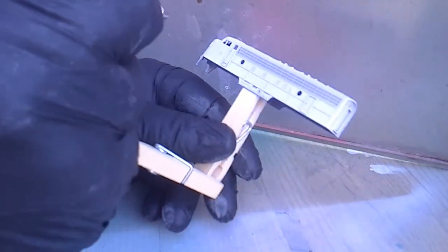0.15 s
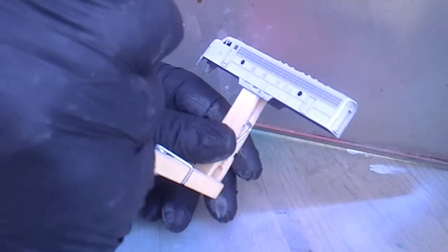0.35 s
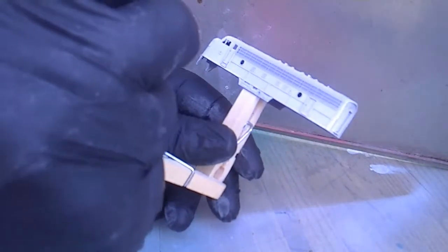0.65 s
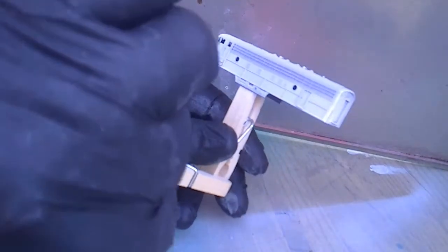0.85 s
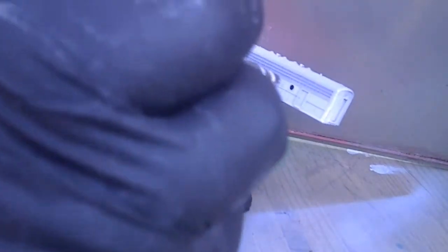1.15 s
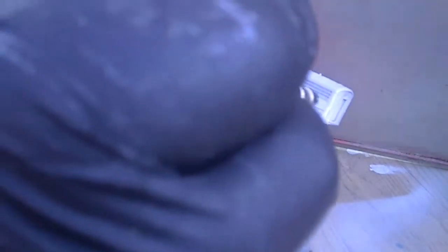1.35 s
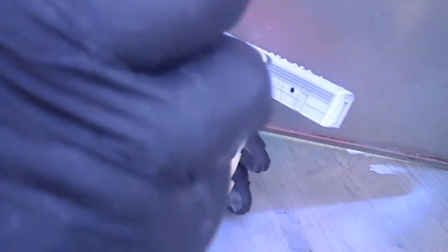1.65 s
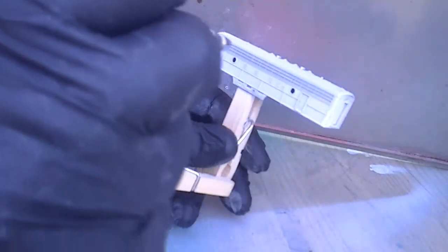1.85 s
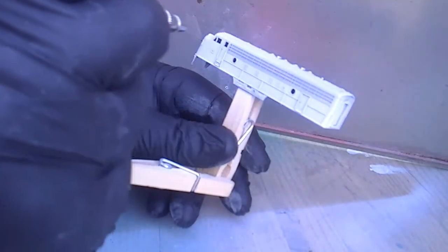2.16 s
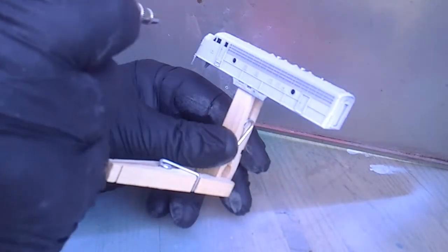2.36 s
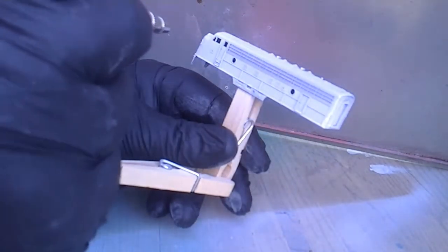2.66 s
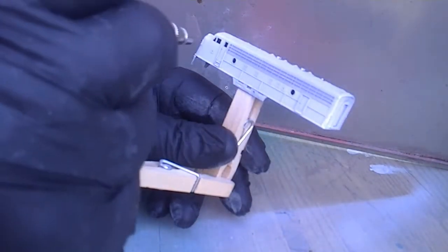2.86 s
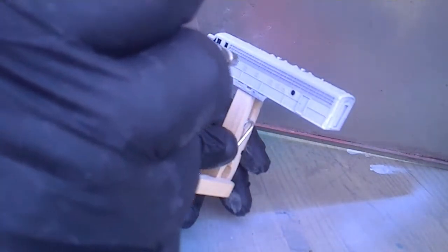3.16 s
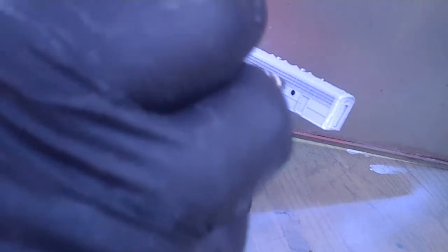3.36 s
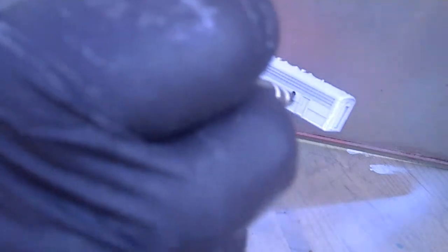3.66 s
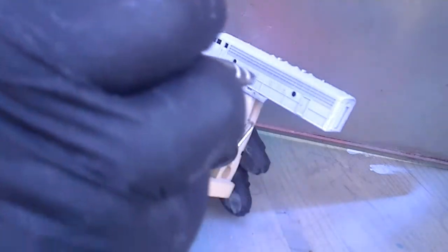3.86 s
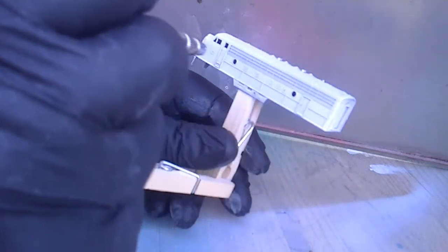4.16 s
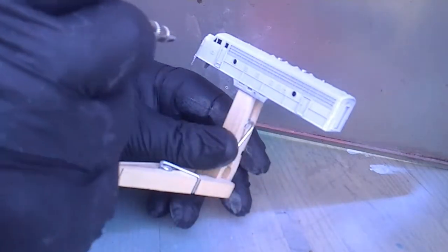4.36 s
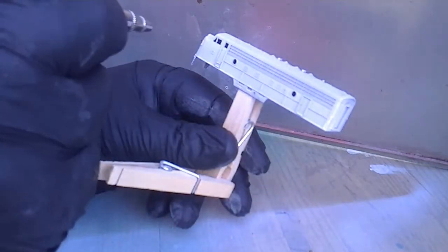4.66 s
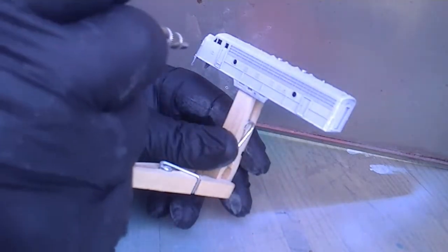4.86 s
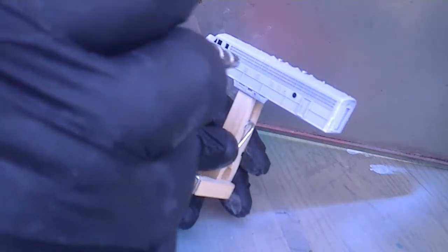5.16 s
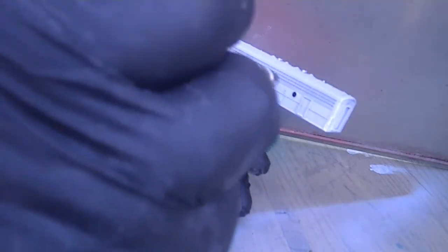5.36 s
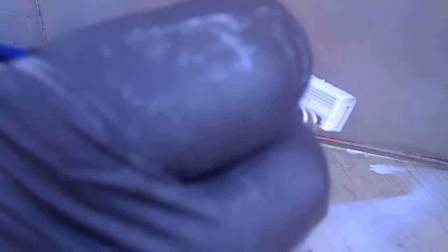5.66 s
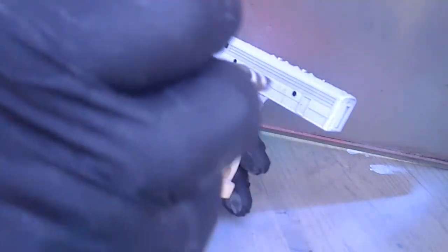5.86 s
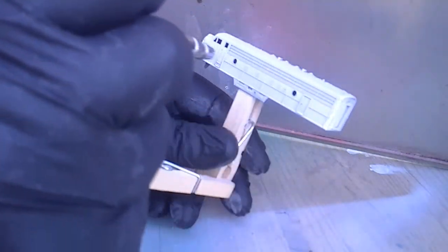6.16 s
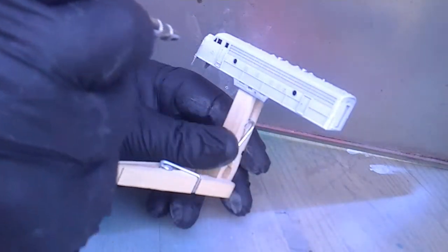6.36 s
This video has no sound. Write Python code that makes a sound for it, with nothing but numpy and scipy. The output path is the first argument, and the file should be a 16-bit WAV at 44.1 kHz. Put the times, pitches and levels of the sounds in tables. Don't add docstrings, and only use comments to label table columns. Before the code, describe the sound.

A bright, dense airbrush hiss runs from start to finish, very close, with one tiny falter near 0.2 s. A thin airy whistle from the nozzle sits faintly inside it, gradually weakening. The nozzle sweeps to and fro over a hollow plastic model, so the hiss ripples in colour like a gentle flanging. The jet drums the flat side in hollow mid-low roars: the tail of one at 0 s, then about 0.7-1.3, 1.7-2.4, 2.8-3.5, 3.9-4.6, 4.9-5.6 and from 5.9 s to nearly the end. Edges and openings tear the air into short rough bursts, notably near 1.2, 2.9, 4.0, 5.1, 6.1 and 6.4 s, some crisper and brighter. Soft low air rumbles in gusts beneath, with brief puffs around 3.8 and 4.6-4.8 s. The small booth adds only a very short tail; the sound is central, with tiny widening flecks, and ends at 6.5 s still spraying.

```python
import sys
import numpy as np
from scipy import signal
from scipy.fft import rfft, irfft, next_fast_len
from scipy.io import wavfile
from scipy.ndimage import map_coordinates

SR = 44100
rng = np.random.default_rng(int(sys.argv[2]) if len(sys.argv) > 2 else 0)


def put_to_file(sound):
    columns = np.atleast_2d(sound).T
    safe = np.clip(columns, -1, 1)
    whole_steps = np.round(safe * 32767)
    wavfile.write(sys.argv[1], SR, whole_steps.astype(np.int16))


def gain_from_db(level_db):
    decades = np.asarray(level_db, float) / 20
    return 10 ** decades


N = 287091

# time_s, path_m
ECHO_PATH = [(0, .228), (.3, .217), (.78, .211), (1.1, .236), (1.52, .266), (1.9, .243), (2.25, .218),
             (2.6, .209), (2.85, .219), (3.12, .236), (3.68, .263), (4.2, .237), (4.5, .220), (4.95, .221),
             (5.2, .240), (5.76, .267), (6.0, .251), (6.51, .220)]
# freq_hz, density_db (per Hz)
HISS_LEFT_COLOUR = [(300, -20.5), (600, -3), (1500, -7.5), (2700, -6), (4000, -9.5), (6200, -8),
                    (6900, -6.5), (9000, -1.5), (10000, -5.5), (11200, 0), (12800, -6), (13900, -12.5),
                    (15000, -13), (15700, -11)]
HISS_RIGHT_COLOUR = [(300, -19), (550, -15), (1400, -7), (2400, -10), (2950, -20), (3450, -5), (4600, -4.5),
                     (6000, -2), (9000, -1.5), (10400, 1), (11200, 1), (13300, -3.5), (14200, -8),
                     (15700, -13)]
# time_s, level_db
HAND_SHADE = [(0, -3.5), (.5, -4.5), (.8, 1), (1.5, 2), (2.0, -1), (2.5, 1.5), (2.85, -1), (3.6, 2.5),
              (4.7, 0), (5.75, 1), (6.51, 0)]
# pitch_hz, width_hz, trim_db
NOZZLE_WHISTLES = [
    (6985, 290, -3),
    (7820, 610, -7.5),
]

# start_s (fully on), held_s, level_db, rise_s and fall_s (per 10 dB)
FLAT_PASSES = [(-.1, .14, -21, .05, 0.1), (.68, .66, -20.5, 0.21, 0.09), (1.72, .64, -19.5, 0.13, .17),
               (2.79, .7, -21, .12, .12), (3.85, 0.727, -24, 0.2, .11), (4.85, .74, -22, .11, .035),
               (5.91, 0.71, -25, .035, .05)]
# start_db (over the roar), change_db_per_s
PASS_RING = [(-6, 0), (-3, -4), (-11, 6), (-4, -4), (-10, 7), (-6, 3), (-9, 3)]
# middle_s, half_length_s, tear_db, opening_db and fine_db (over the tearing)
EDGE_CROSSINGS = [(.03, .05, -26.5, -10, -4), (.66, 0.093, -25, -9, 0), (.81, 0.09, -23, -3, -4),
                  (1.215, .055, -17.5, -1, -6), (2.0, .06, -30, 0.5, -7), (2.31, .08, -21, -5.5, -1),
                  (2.84, 0.062, -22.5, -4.5, -1), (2.94, 0.097, -22, 1, 2.5), (3.07, 0.067, -25, 2.5, -2),
                  (3.39, 0.064, -21, -4.5, -5), (3.8, .055, -27, -12, -2), (3.99, 0.075, -15.5, -2.5, -4.5),
                  (4.1, 0.053, -26, -0.5, -6), (4.33, 0.089, -22, 2.5, 0.5), (4.46, 0.075, -21, -2, 3),
                  (4.6, 0.038, -21.5, -3, -11.5), (4.83, 0.036, -22.5, -1.5, -8), (4.96, 0.07, -22, -2, 3),
                  (5.06, 0.092, -18.5, 0.5, -1), (5.39, 0.093, -22, -2.5, -9), (6.07, .08, -16, -4, -5),
                  (6.19, .05, -26, -2.5, -11), (6.38, 0.065, -17.5, -0.5, -0.5), (6.48, .06, -20, -2, 3.5)]
# freq_hz, density_db (per Hz)
ROAR_COLOUR = [(120, -33), (200, -35), (389, -15.5), (755, -0.5), (1260, 3), (1430, 1), (1690, -10.5),
               (2570, -7), (3330, -19), (3750, -26), (4500, -34.5), (5850, -53), (9900, -120)]
# freq_hz, density_db (per Hz)
TEAR_COLOUR = [(710, -8), (1200, -9.5), (1510, -14), (1660, -7.5), (1840, -0.5), (2650, -4.5), (3390, -3.5),
               (3760, 0.5), (4630, -5.5), (5130, -1.5), (8000, -14), (10400, -53), (17600, -120)]
# pitch_hz, width_hz, level_db (over the smooth colour)
SHELL_MODES = [(1510, 180, 8.5), (3687, 220, 6.5), (1903, 290, 1.5), (691, 160, 4), (1008, 54, 3),
               (1844, 58, 3.5), (2033, 56, 4), (2400, 76, -0.5), (2864, 73, 5), (3190, 120, 5.5),
               (4200, 92, 5), (4350, 60, 5), (4960, 90, 3), (5400, 130, 3), (1257, 82, -7), (2804, 89, -3),
               (6330, 150, -5.5)]

# middle_s, half_length_s, level_db, deep_db (over level_db)
AIR_GUSTS = [(.05, 0.18, -45, 0), (.85, 0.46, -41, 0), (1.9, 0.46, -38, -1), (2.7, .3, -41, -1),
             (3.5, .3, -45, -4), (3.77, 0.066, -39, 3), (4.62, .07, -35, -8), (4.73, .15, -41, 2),
             (4.84, .05, -34, -5), (5.75, 0.43, -41, 2)]
# freq_hz, density_db (per Hz)
RUMBLE_COLOUR = [(15, -81), (25, -51), (49, -45), (128, -18.5), (221, -9.5), (382, -9), (600, 0.5),
                 (780, -45), (1320, -120)]
# pitch_hz, width_hz, level_db
MIC_DIPS = [(1710, 120, -4), (3280, 93, -4), (2240, 80, -4), (2715, 80, -3), (4010, 80, -4), (860, 110, -2)]
# middle_s, low_hz, high_hz, level_db
SIDE_FLECKS = [(.725, 7600, 9100, -36), (1.33, 5300, 7000, -35), (1.63, 9100, 11900, -35),
               (1.63, 13200, 15700, -42), (1.865, 6330, 7700, -36), (1.865, 11800, 14600, -33),
               (4.005, 9700, 11300, -36), (4.005, 11800, 13300, -35), (4.585, 4200, 5800, -33),
               (5.074, 5200, 6900, -29), (5.075, 12400, 13900, -40), (5.165, 4200, 5800, -38),
               (5.165, 7600, 9800, -32), (5.585, 8300, 9800, -36.5), (5.585, 13200, 15700, -36),
               (6.4, 13200, 14600, -43)]

LEFT_M, RIGHT_M = .215, .262
SOUND_SPEED = 343
ECHO, ECHO_LOW_HZ, ECHO_HIGH_HZ = .4, 8600, 13800
HISS_DB, HISS_RIGHT_DB, SHADE_HZ = -27, -1, 6300
STUTTER_S, STUTTER_HALF_S, STUTTER_DB = 0.187, .015, -4
RIM_DB, RIM_RIGHT_DB, RIM_EDGE_DB = -34, -13, -9.5
CAP_DB, CAP_DB_PER_S, CAP_MIDDLE_DB, CAP_RIGHT_DB = -24.5, -2.5, -6, -3
WOBBLE_DB, WOBBLE_PER_S = .9, 16
EDGE_DROP_DB, EDGE_SHARPNESS = 8, 1.94
HOLLOW_EDGE_DB = -8
FLAT_TEAR_DB, FLAT_WINDOW_DB, FLAT_FINE_DB = -11.5, -17.5, -14.5
STILL_AIR_DB = -49
BOOTH_DB, BOOTH_T60_S = -9, .03


def nozzle(path_m, place, edge_gain):
    t = np.arange(N) / SR
    large_eddies = split(turbulence(gust_db=0.85, eddy_db=1.0), 11070)[0]
    small_eddies = split(turbulence(gust_db=1.2, eddy_db=1.0), 10670)[1]
    air = large_eddies + small_eddies
    hiss = (1 - place) * coloured(air, HISS_LEFT_COLOUR) + place * coloured(air, HISS_RIGHT_COLOUR)

    beam_band = signal.butter(2, [ECHO_LOW_HZ, ECHO_HIGH_HZ], "band", fs=SR, output="sos")
    beamed = signal.sosfiltfilt(beam_band, hiss)
    echo_gain = ECHO * (0.4 + 0.5 * np.sin(2.4 * place)) * gain_from_db(1.8 * drift(5.5))
    low, high = split(hiss + echo_gain * echo(beamed, path_m), SHADE_HZ)

    stutter_db = STUTTER_DB * np.exp(-((t - STUTTER_S) / STUTTER_HALF_S) ** 2)
    hiss_db = HISS_DB + HISS_RIGHT_DB * place + stutter_db
    open_db, = in_time(HAND_SHADE)

    rim_power = gain_from_db(2 * RIM_DB) + (gain_from_db(RIM_EDGE_DB) * edge_gain) ** 2
    rim_db = 10 * np.log10(rim_power) + RIM_RIGHT_DB * place + 1.5 * drift(2.5)
    cap_db = CAP_DB + CAP_DB_PER_S * t + CAP_MIDDLE_DB * np.sin(np.pi * place)
    cap_db = cap_db + CAP_RIGHT_DB * place + 1.5 * drift(2.5)
    tones = np.zeros(N)
    for level_db, (pitch_hz, width_hz, trim_db) in zip((rim_db, cap_db), NOZZLE_WHISTLES):
        tones += gain_from_db(level_db + trim_db) * whistle(pitch_hz, width_hz)
    return gain_from_db(hiss_db + 2.0) * (gain_from_db(open_db) * low + high) + tones


def echo(x, path_m):
    return map_coordinates(x, [np.arange(N) - path_m / SOUND_SPEED * SR], order=3, mode="reflect")


def whistle(pitch_hz, width_hz):
    r, w = np.exp(-np.pi * width_hz / SR), 2 * np.pi * pitch_hz / SR
    ring = [1, 0, -1.7], [1, -2 * r * np.cos(w), r * r]
    once = signal.lfilter(*ring, rng.standard_normal(N))
    return rms_one(signal.lfilter(*ring, once))


def jet_on_shell(tear, opening, fine_tear):
    flat, ring = passes()
    drum, upper = split(coloured(turbulence(gust_db=0.1, eddy_db=1.5), ROAR_COLOUR, SHELL_MODES), 1110)
    coarse, rest = split(coloured(turbulence(gust_db=.8, eddy_db=1.0), TEAR_COLOUR, SHELL_MODES), 2860)
    window, fine = split(rest, 4650)

    hollow = np.hypot(ring, tear * gain_from_db(HOLLOW_EDGE_DB))
    roar = flat * drum * gain_from_db(1.2 + WOBBLE_DB * drift(WOBBLE_PER_S))
    roar = roar + hollow * upper * gain_from_db(4.5 + WOBBLE_DB * drift(WOBBLE_PER_S))

    window_gain = np.hypot(opening, flat * gain_from_db(FLAT_WINDOW_DB))
    fine_gain = np.hypot(fine_tear, flat * gain_from_db(FLAT_FINE_DB))
    bright = gain_from_db(3.5) * (window_gain * window + fine_gain * fine)
    coarse_gain = np.hypot(tear, flat * gain_from_db(FLAT_TEAR_DB))
    return gain_from_db(-0.57) * (roar + bright) + gain_from_db(2.0) * coarse_gain * coarse


def passes():
    start_s, held_s, level_db, rise_s, fall_s = np.transpose(FLAT_PASSES)[:, :, None]
    t = control_times()
    early, late = (start_s - t) / rise_s, (t - start_s - held_s) / fall_s
    roar_db = level_db - 10 * np.maximum(0, np.maximum(early, late))
    start_db, db_per_s = np.transpose(PASS_RING)[:, :, None]
    ring_db = start_db + db_per_s * np.clip(t - start_s, 0, 1)
    return [summed_gain(roar_db), summed_gain(roar_db + ring_db)]


def swells(rows):
    middle_s, half_s, level_db, *over_db = np.transpose(rows)[:, :, None]
    away = np.abs((control_times() - middle_s) / half_s)
    level_db = level_db - EDGE_DROP_DB * away ** EDGE_SHARPNESS
    return [summed_gain(level_db + extra_db) for extra_db in [0, *over_db]]


def booth(x, place):
    s = np.arange(600) / SR
    tails = rng.standard_normal((4, len(s))) * gain_from_db(-60 * s / BOOTH_T60_S) * (s > .0012)
    tails = tails / np.sqrt(np.sum(tails ** 2, axis=1, keepdims=True))
    bright = split(x, 1300)[1]
    wet = np.zeros(N)
    for k, tail in enumerate(tails):
        nearness = np.clip(1 - abs(3 * place - k), 0, 1)
        wet += np.sqrt(nearness) * signal.oaconvolve(bright, tail)[:N]
    return (x + gain_from_db(BOOTH_DB) * wet) / np.sqrt(1 + gain_from_db(2 * BOOTH_DB))


def spent_air():
    gain, deep_gain = np.hypot(swells(AIR_GUSTS), gain_from_db(STILL_AIR_DB))
    deep, rest = split(coloured(turbulence(gust_db=1.5, eddy_db=-0.1), RUMBLE_COLOUR), 240)
    return gain_from_db(4.0) * (deep_gain * deep + gain * rest)


def side_flecks():
    out, window = np.zeros(N), np.hanning(2048) ** 1.1
    for middle_s, low_hz, high_hz, level_db in SIDE_FLECKS:
        band = signal.butter(8, [low_hz, high_hz], "band", fs=SR, output="sos")
        fleck = rms_one(signal.sosfilt(band, rng.standard_normal(2048)))
        out[round(middle_s * SR) - 1024:][:2048] += gain_from_db(level_db) * window * fleck
    return out


def turbulence(gust_db, eddy_db):
    return rng.standard_normal(N) * gain_from_db(gust_db * drift(4.4) + eddy_db * drift(270))


def drift(rate_hz):
    r = np.exp(-2 * np.pi * rate_hz / SR)
    return rms_one(signal.lfilter([1], [1, -2 * r, r * r], rng.standard_normal(N + SR))[SR:])


def coloured(x, colour, modes=()):
    size = next_fast_len(N)
    hz = np.fft.rfftfreq(size, 1 / SR) + 1
    freq_hz, density_db = np.transpose(colour)
    db = np.interp(np.log(hz), np.log(freq_hz), density_db, left=-90, right=-90)
    for pitch_hz, width_hz, level_db in [*modes, *MIC_DIPS]:
        db = db + level_db / (1 + (2 * (hz - pitch_hz) / width_hz) ** 2)
    return rms_one(irfft(rfft(x, size) * gain_from_db(db), size)[:N])


def split(x, hz):
    low = signal.sosfiltfilt(signal.butter(4, hz, fs=SR, output="sos"), x)
    return low, x - low


def rms_one(x):
    return x / np.sqrt(np.mean(x ** 2) + 1e-20)


def in_time(rows):
    s, *columns = np.transpose(rows)
    return [np.interp(np.arange(N) / SR, s, column) for column in columns]


def control_times():
    return np.arange(0, N + 64, 64) / SR


def summed_gain(db):
    return np.interp(np.arange(N) / SR, control_times(), np.sqrt(np.sum(gain_from_db(2 * db), axis=0)))


def scene():
    path_m, = in_time(ECHO_PATH)
    place = np.clip((path_m - LEFT_M) / (RIGHT_M - LEFT_M), 0, 1)
    tear, opening, fine_tear = swells(EDGE_CROSSINGS)
    hiss = booth(nozzle(path_m, place, np.hypot(tear, fine_tear)), place)
    mono = hiss + jet_on_shell(tear, opening, fine_tear) + spent_air()
    return np.tile(mono, (2, 1))


def band_limit(x):
    return signal.sosfilt(signal.butter(12, 15800, fs=SR, output="sos"), x)


def record(dry):
    cut = signal.sosfilt(signal.butter(2, 65, "high", fs=SR, output="sos"), dry)
    mix = cut + side_flecks() * [[1], [-1]]
    return band_limit(mix)


dry = scene()
out = record(dry)
put_to_file(out)
```